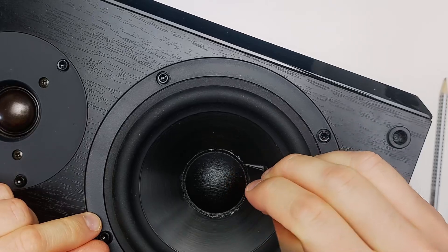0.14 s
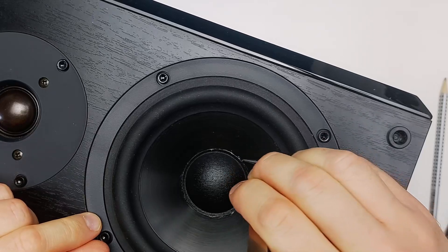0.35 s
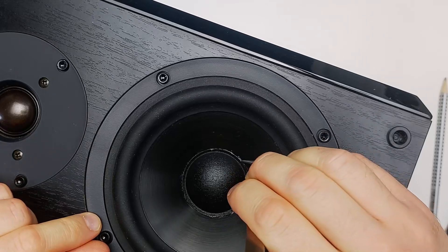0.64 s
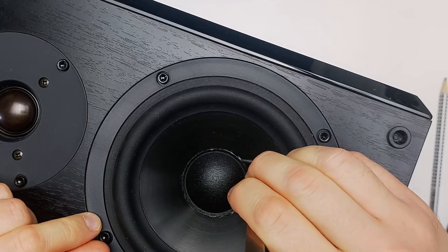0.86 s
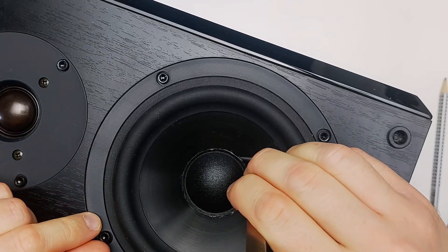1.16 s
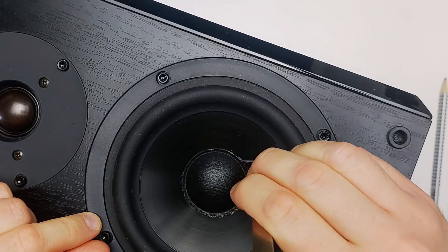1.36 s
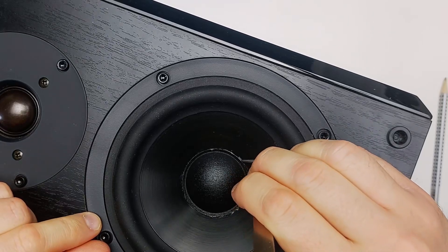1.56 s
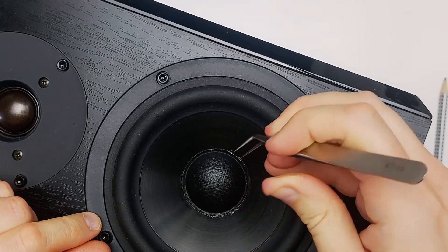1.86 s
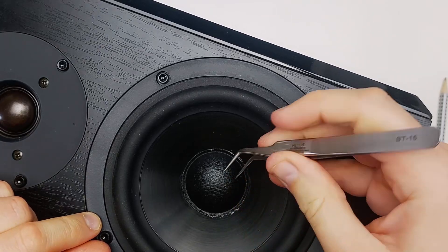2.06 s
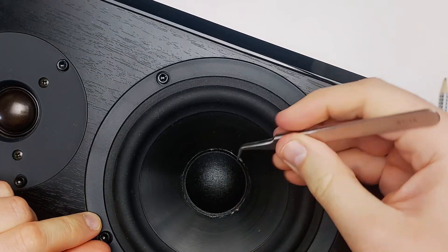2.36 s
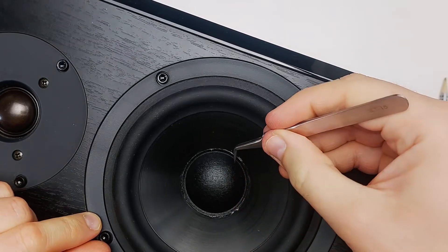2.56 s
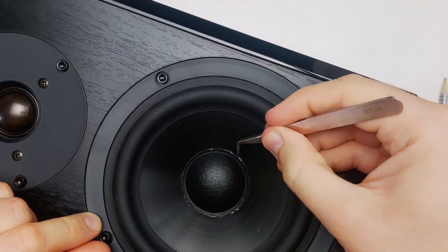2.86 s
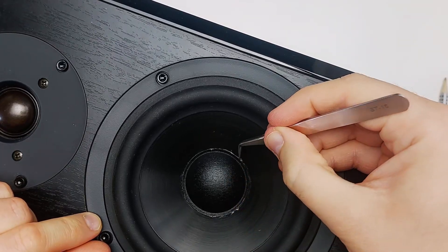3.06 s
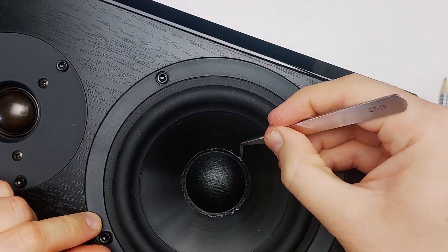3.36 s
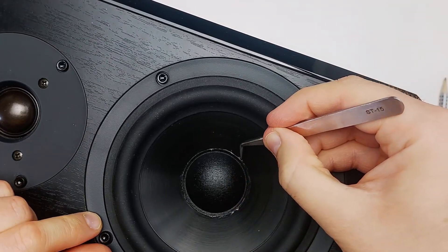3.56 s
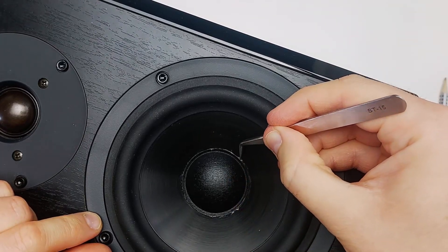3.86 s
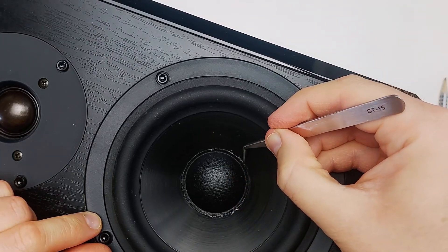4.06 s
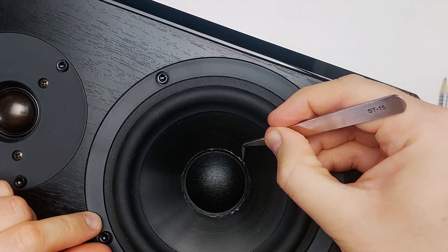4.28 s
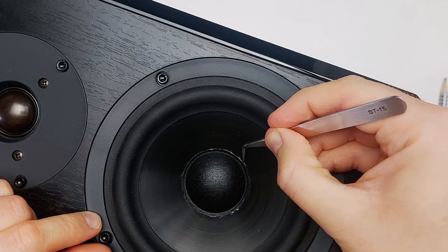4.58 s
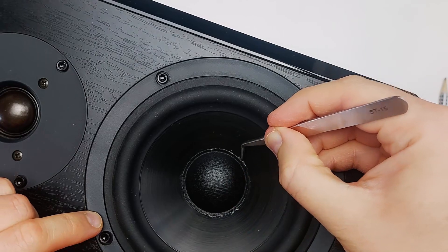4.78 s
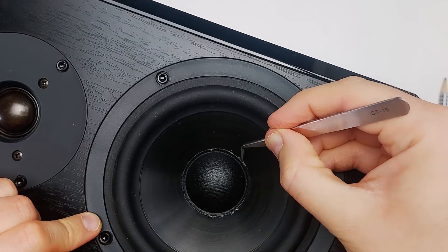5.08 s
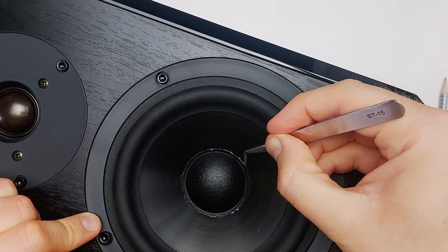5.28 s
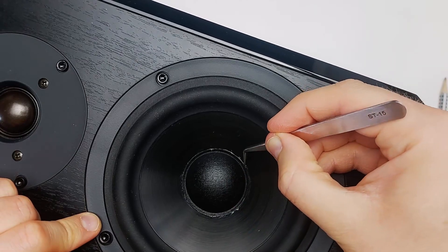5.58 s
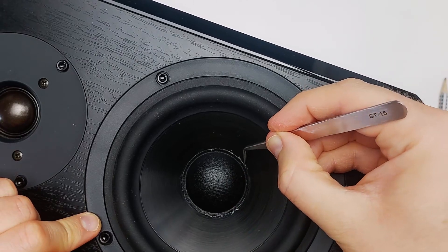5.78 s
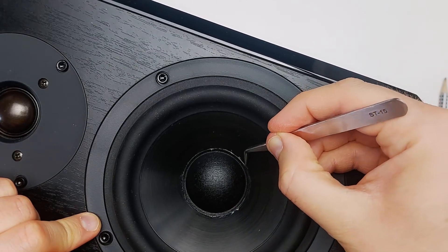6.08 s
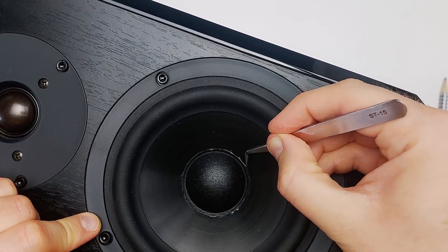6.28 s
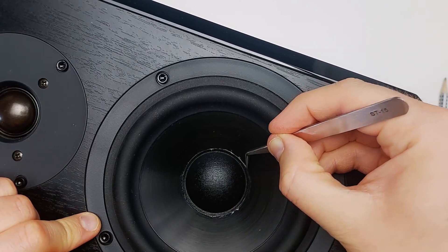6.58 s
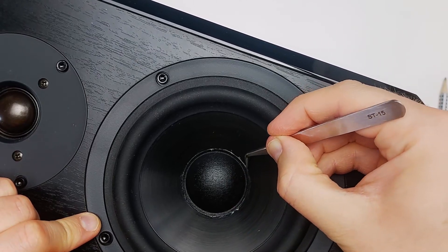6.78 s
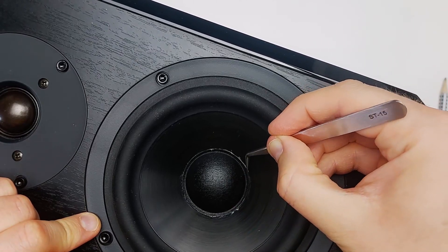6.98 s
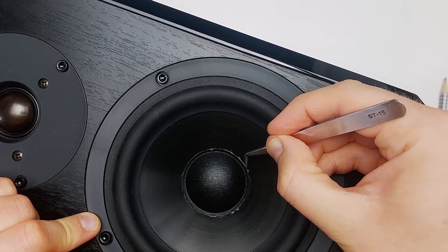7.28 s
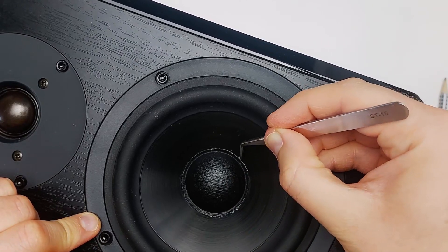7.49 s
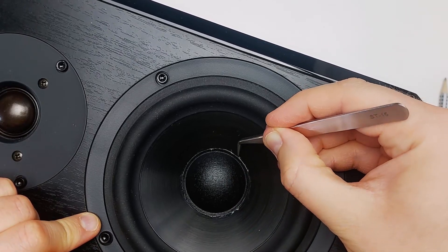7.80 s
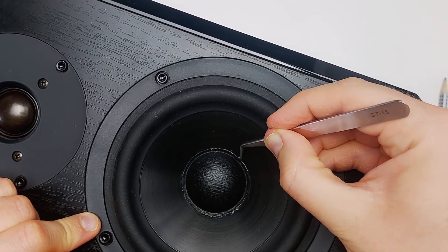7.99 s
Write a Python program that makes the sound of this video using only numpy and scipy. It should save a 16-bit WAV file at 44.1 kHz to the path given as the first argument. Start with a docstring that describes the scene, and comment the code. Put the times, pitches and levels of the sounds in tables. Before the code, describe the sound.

Tweezers pick at a loudspeaker cone with small hollow knocks, ticks and light scratches over a low hum.

```python
"""Small thuds, knocks, ticks and scratches sound over a low mains hum and faint room and microphone noise.
Steel tweezers are picking at old glue on the paper cone of a loudspeaker lying on a table.
Each touch sets the box, its panels, the cone and the steel tip ringing; scraping shakes them with many
tiny slips. The cone knocks softly as it settles back, the tweezer arms clink, and a hand brushes past.
Below, a "mode" is one tone an object rings at, and "t60" is the time it takes to fade by 60 dB."""
import sys
import numpy as np
from scipy import signal
from scipy.fft import rfft, irfft, next_fast_len
from scipy.io import wavfile

SR = 44100
rng = np.random.default_rng(int(sys.argv[2]) if len(sys.argv) > 2 else 0)


def dump(signal):
    """Clip the signal to [-1, 1] and save it as 16-bit WAV at the path in sys.argv[1]."""
    limited = np.clip(np.atleast_2d(signal).T, -1, 1)
    pcm = np.round(limited * 32767).astype(np.int16)
    wavfile.write(sys.argv[1], SR, pcm)


N = 358974


def from_db(db):
    """Turn decibels into a gain to multiply by."""
    return 10 ** (np.asarray(db) / 20)


def pan(db):
    """Left and right gains, with the left louder by db."""
    return from_db([[db / 2], [-db / 2]])


def rms_one(x):
    """Scale a signal to an average level (rms) of 1."""
    return x / np.sqrt(np.mean(x ** 2) + 1e-20)


def at_hz(points, hz):
    """Read between the rows of a (frequency, value) table, with octaves evenly spaced."""
    freqs, values = np.transpose(points)
    return np.interp(np.log(hz), np.log(freqs), values)


def drift(rate_hz):
    """A slow random wobble, about 1 in size."""
    keep = np.exp(-80 * np.pi * rate_hz / SR)
    noise = rng.standard_normal(N // 40 + 2002)   # one value every 40 samples
    slow = signal.lfilter([1], [1, -2 * keep, keep * keep], noise)[2000:]
    return np.interp(np.arange(N) / 40, np.arange(len(slow)), rms_one(slow))


def ring(clicks, hz, t60):
    """Each click starts a fading sine wave as tall as the click."""
    keep, turn = from_db(-60 / (t60 * SR)), 2 * np.pi * hz / SR
    return signal.lfilter([0, np.sin(turn)], [1, -2 * keep * np.cos(turn), keep * keep], clicks + 1e-18)


def banded_noise(spectrum, flicker_db):
    """Stereo noise of rms 1, built from third-octave bands that each flicker on their own."""
    # how alike left and right are: (frequency [Hz], likeness [1 = the same])
    likeness = [(30, 0.96), (120, 0.77), (300, 0), (700, .15), (1500, 0), (5500, 0), (7500, 0.95),
                (15000, 1)]
    out, edges = 0, 25 * 2 ** np.arange(0, 9.4, 1 / 3)
    white = rng.standard_normal((2, 2, N))
    for k, (low, high) in enumerate(zip(edges, edges[1:])):
        band = signal.butter(2, [low, high], "band", fs=SR, output="sos")
        mid, side = signal.sosfilt(band, white[k % 2])
        hz = np.sqrt(low * high)
        alike = np.clip(at_hz(likeness, hz), -.78, .78)
        gain = from_db(at_hz(spectrum, hz) + flicker_db * drift(10))
        out = out + gain * (np.sqrt(1 + alike) * mid + np.sqrt(1 - alike) * side * [[1], [-1]])
    return rms_one(out)


def strokes(rows, rise_db_per_s, fall_db_per_s):
    """Each stroke swells up to its start, holds, then fades; gives one gain curve per level column."""
    t, out = np.arange(N) / SR, 0
    for start, length, *level_db in rows:
        before, after = np.maximum(start - t, 0), np.maximum(t - start - length, 0)
        near = (before < 1) & (after < 1)
        drop_db = rise_db_per_s * before[near] + np.c_[fall_db_per_s] * after[near]
        gain = np.zeros((len(level_db), N))
        gain[:, near] = from_db(np.c_[level_db] - drop_db)
        out = out + gain
    return out


def background_noise():
    """The room and the microphone add a faint rumble and hiss."""
    # tone of the noise: (frequency [Hz], relative level [dB])
    colour = [(30, -12), (60, -1), (85, -5.5), (120, -1.5), (165, -10), (215, -5.5), (300, -12),
              (400, -23.5), (520, -16.5), (800, -31), (1200, -28.5), (2000, -35.5), (3500, -41),
              (6300, -46), (7800, -46), (10000, -39), (13000, -48), (16000, -38.5)]
    return from_db(-62.5) * banded_noise(colour, flicker_db=1.4)


def mains_hum():
    """Mains power hums in low tones that waver a little."""
    # hum tones: (frequency [Hz], level [dB], waver [dB])
    tones = [(120.0, -54.5, 0.5), (60.0, -75.5, 1.5), (210, -77.5, 6.5)]
    t, out = np.arange(N) / SR, 0
    for hz, level_db, waver_db in tones:
        height = np.sqrt(2) * from_db(level_db + waver_db * drift(1))
        out = out + height * np.sin(2 * np.pi * hz * t + 0.37 * drift(1.8))
    return out * pan(1)


def room_echo(x, t60=0.27, wall_cut_hz=3500):
    """Sound bounces between walls: six repeating echoes a side, softer and duller each time round."""
    size = next_fast_len(N + SR)
    turn = 2 * np.pi * np.arange(size // 2 + 1) / size   # frequency in radians per sample
    dull = 1 / (1 + 1j * turn * SR / (2 * np.pi * wall_cut_hz))
    lags = rng.uniform(.008, 0.046, (2, 6)) * SR
    response = np.zeros((2, len(turn)), complex)
    for (side, k), lag in np.ndenumerate(lags):
        trip = from_db(-60 * lag / SR / t60) * dull * np.exp(-1j * turn * round(lag))
        response[side] += (-1) ** k * trip / (1 - trip)   # all the round trips added up
    return irfft(rfft(x, size) * response, size)[:, :N]


def hand_brush():
    """Skin and sleeve brush past in one short puff of noise."""
    # the brushing move: (start [s], length [s], level [dB])
    moves = [(1.714, 0.029, -60)]
    # its tone: (frequency [Hz], relative level [dB])
    colour = [(700, -3), (1100, -2), (1500, -3), (1900, 4), (2400, -15), (3700, -15.5), (5200, -9.5),
              (6200, -16.5), (7500, -14), (11000, -19), (16000, -22)]
    swell = strokes(moves, rise_db_per_s=1600, fall_db_per_s=[272])
    return swell * banded_noise(colour, flicker_db=2.0) * pan(3)


def finger_slides():
    """Fingers slide along the steel with a brief, high hiss."""
    # the slides: (start [s], length [s], level [dB])
    moves = [(2.079, 0.011, -80), (2.422, .005, -73)]
    # their tone: (frequency [Hz], relative level [dB])
    colour = [(3000, -12), (7000, -8), (11500, -3), (16000, -1)]
    swell = strokes(moves, rise_db_per_s=6000, fall_db_per_s=[150])
    return swell * banded_noise(colour, flicker_db=1.0)


def squeak(start_s=3.207, hz=4200, t60=.08, level_db=-77):
    """A short rub sets one high tone ringing."""
    t = np.arange(N) / SR - start_s
    rub = (t > 0) * np.exp(-abs(t) / .025) * rng.standard_normal(N)
    ring_gain = np.sqrt(t60 * SR / np.log(1000) / 4)   # how much ringing boosts noise
    return from_db(level_db) * ring(rub, hz, t60) / ring_gain


def cone_knocks():
    """The cone settles back with hollow knocks; ringing each mode twice makes them swell softly."""
    # the knocks: (time [s], level [dB])
    knocks = [(4.452, -50), (4.748, -50.5), (5.06, -41.5), (5.395, -47), (5.672, -46.5), (5.788, -61),
              (5.904, -46), (6.149, -44.5), (6.637, -50.5), (6.867, -47.5), (7.087, -42), (7.36, -47.5),
              (7.694, -48.5)]
    # their hollow modes: (frequency [Hz], level [dB], t60 [s], time shift [s])
    modes = [(264, 1, 0.044, 0.0), (394.7, -13.5, 0.059, 0.0), (545, -16, 0.026, -.004)]
    times, knock_db = np.transpose(knocks)
    luck, out = rng.standard_normal((len(times), len(modes))), np.zeros(N)
    for k, (hz, level_db, t60, shift) in enumerate(modes):
        drive = np.zeros(N)
        drive[((times + shift) * SR).astype(int)] = from_db(knock_db + level_db + 2.0 * luck[:, k])
        peak = t60 * SR / (2 * np.e * np.log(1000))   # height a click reaches after two rings
        out += ring(ring(drive, hz, t60), hz, t60) / peak
    return out * pan(4)


def struck(modes, times, blow_db, spread_db, soft_hz, rubbing=0, tilt_db=0, crunch_s=0, rub_tilt_db=0):
    """Blows and rubbing ring an object's modes; a tilt (dB per octave) above 0 favours the high ones."""
    at, out = np.round(np.asarray(times) * SR).astype(int), np.zeros((2, N))
    luck = rng.standard_normal((len(at), len(modes), 3))   # random strength: shared, left, right
    soft = signal.butter(4, min(soft_hz, .45 * SR), fs=SR, output="sos")   # soft contact dulls a blow
    cracks = rng.standard_normal(N)
    for k, (hz, level_db, t60, pan_db) in enumerate(modes):
        octaves_up = np.log2(hz / modes[0][0])
        luck_db = spread_db * (luck[:, k, :1] + 0.79 * luck[:, k, 1:]).T
        drive = np.zeros((2, N))
        drive[:, at] -= from_db(blow_db + tilt_db * octaves_up + luck_db)
        if crunch_s:   # each blow becomes a burst of cracks dying over this time
            keep = np.exp(-1 / (crunch_s * SR))
            drive = cracks * signal.lfilter([np.sqrt(1 - keep ** 2)], [1, -keep], drive + 1e-18)
        drive += rubbing * from_db(rub_tilt_db * octaves_up)
        out += from_db(level_db) * pan(pan_db) * ring(drive, hz, t60)
    return signal.sosfilt(soft, out)


def grit(per_s, spread_db, apart):
    """Tiny random slips, a few much larger; `apart` is the gain of extra slips heard on one side only."""
    sizes = from_db(spread_db * np.minimum(rng.exponential(1, (3, N)), 4)) * rng.choice([-1, 1], (3, N))
    slips = sizes * (rng.random((3, N)) < per_s / SR)
    return rms_one(slips[0] + apart * slips[1:])


def tip_pressure():
    """The tip's scrapes add to its resting weight; gives strength curves for cone, box and rasp."""
    # scrapes across the glue: (start [s], length [s], cone [dB], box [dB], rasp [dB])
    scrapes = [(0.004, 0.02, -60, -43, -82), (0.43, 0.024, -67, -49.5, -90), (0.89, 0.018, -67, -58.5, -84),
               (1.19, 0.045, -62, -43, -79), (1.52, .01, -74, -49.5, -91), (1.6, 0.022, -65.5, -52.5, -90),
               (2.85, .04, -72, -52, -87), (3.235, .03, -69, -59, -83), (3.31, 0.014, -70, -67, -76),
               (3.58, 0.01, -58, -61, -78), (3.82, 0.022, -75, -50.5, -89), (4.025, 0.03, -56, -66, -78.5),
               (4.35, 0.023, -77, -57, -84), (4.64, 0.045, -61, -52, -80.5),
               (4.974, 0.0078, -61, -41, -66.5), (5.28, 0.035, -55, -46, -75.5),
               (5.6, 0.016, -71, -52, -97), (5.89, 0.026, -79, -54.5, -94), (6.04, 0.024, -63, -53.5, -92),
               (6.27, 0.018, -66, -56, -86), (6.4, .01, -78, -50.5, -77), (6.5, 0.029, -59.5, -50, -76.5),
               (6.75, 0.033, -54, -45, -74), (6.982, 0.018, -55, -46.5, -78.5), (7.25, 0.03, -62, -59, -80),
               (7.56, 0.045, -59, -52, -75), (7.66, 0.028, -70, -46, -76), (7.93, 0.049, -61, -47.5, -83),
               (8.02, .02, -79, -53.5, -76.5)]
    # weight of the resting tip: (time [s], push on the box [dB])
    weight = [(0.4, -69), (0.8, -53.5), (1.1, -63), (1.68, -59.5), (1.75, -87), (2.7, -81), (2.9, -65),
              (4.1, -55), (4.4, -48.5), (5.3, -53.5), (6.2, -55.5), (6.9, -50.5), (7.201, -52.5),
              (7.401, -50), (7.5, -78), (8.14, -59)]
    times, push_db = np.transpose(weight)
    rest_db = np.interp(np.arange(N) / SR, times, push_db)
    resting = from_db(rest_db + np.c_[[-24, 0, -38.5]])   # weaker in the cone and the rasp
    return strokes(scrapes, rise_db_per_s=992, fall_db_per_s=[363, 141, 377]) + resting


def crumbling_glue(times, level_db, t60=0.13):
    """Glue crumbles after each touch; gives a strength curve that jumps up and dies away."""
    jumps = np.zeros(N)
    jumps[(times * SR).astype(int)] = from_db(level_db)
    return signal.lfilter([1], [1, -from_db(-60 / (t60 * SR))], jumps)


def glue_rasp(strength):
    """The tip drags over the glue with a flickering hiss."""
    # tone of the rasp: (frequency [Hz], relative level [dB])
    colour = [(1500, -9), (2500, 7), (4300, 5.5), (6500, 0), (8000, 5), (11000, -5), (16000, 1)]
    return from_db(-3.0) * strength * banded_noise(colour, flicker_db=1.6)


def steel_ticks(times, tip_db, rubbing, crunch_s=.0008):
    """The tip ticks and scratches, and the tweezer arms clink; thin steel gives off little low sound."""
    # modes of the tip and of the arms: (frequency [Hz], level [dB], t60 [s], left over right [dB])
    tip_modes = [(4400, -24, .012, 8), (5900, -23, .006, 12), (7910, -4, .004, 12), (9570, -4, .003, 12),
                 (11000, -9, .002, 6), (14500, -12, .002, 4)]
    arm_modes = [(4300, -10, .025, 7), (6000, -8, .015, 10), (8500, -5, .016, 10), (11300, -5, .03, 8),
                 (13300, -12, .015, 6), (15300, -6, .015, 4)]
    # clinks of the arms, dry ticks of the tip alone: (time [s], level [dB], sharpness [dB per octave])
    clinks = [(2.4193, -54, 5), (4.972, -44.5, -13.5), (7.646, -45, -14), (8.0134, -48.5, -9)]
    ticks = [(0.888, -70, 7), (1.669, -66, 5), (2.0783, -78, 3)]
    out = struck(tip_modes, times, tip_db, spread_db=3.7, soft_hz=18000, rubbing=rubbing,
                 crunch_s=crunch_s)
    clink_s, clink_db, clink_tilt_db = np.transpose(clinks)
    out += struck(arm_modes, clink_s, clink_db - 9.5, spread_db=4.05, soft_hz=20000,
                  tilt_db=clink_tilt_db, crunch_s=crunch_s)
    tick_s, tick_db, tick_tilt_db = np.transpose(ticks)
    out += struck(tip_modes, tick_s, tick_db, spread_db=2.2, soft_hz=20000,
                  tilt_db=tick_tilt_db, crunch_s=crunch_s)
    return signal.sosfilt(signal.butter(2, 3800, "high", fs=SR, output="sos"), out)


def tweezers_on_speaker():
    """Touches and scrapes shake the box, its panels, the paper cone and the steel together."""
    # touches: (time [s], cone [dB], box [dB], panel [dB], tip [dB], sharpness [dB per octave])
    touches = [(0.008, -53, -41, -49.5, -95, 1), (0.435, -63, -46, -50.5, -95, -3),
               (0.462, -71, -46, -62, -92, -12), (0.623, -73, -49, -56.5, -90, 0),
               (0.789, -79, -44, -79, -91, 2), (1.139, -41, -67, -37, -73, -10),
               (1.204, -75, -47.5, -52, -77, 6), (1.301, -52, -68, -45, -84, -10),
               (1.517, -46, -52.5, -37.5, -97, -4), (1.594, -44.5, -72, -44, -95, -4.5),
               (1.705, -46.5, -46.5, -52, -88, -8), (2.803, -46.5, -46, -54.5, -80, -8),
               (2.863, -53, -60, -49.5, -91, -7), (2.941, -49.5, -45, -63, -84, -21),
               (3.087, -59.5, -58, -60, -77, -4), (3.229, -42, -41.5, -46.5, -72.5, 1),
               (3.297, -48.5, -47.5, -43.5, -84, 0), (3.314, -46.5, -63, -78, -76, 3),
               (3.568, -52, -47.5, -55, -81, -1), (3.669, -68, -61, -63, -76, 10),
               (3.745, -61, -47.5, -68, -93, -4), (3.819, -52, -59, -53, -86, -11),
               (4.02, -65, -72, -52.5, -81, 9.5), (4.083, -44.5, -53.5, -53, -70.5, 7.5),
               (4.171, -56, -47, -50, -76, 1.5), (4.252, -41, -40.5, -48, -69.5, -5),
               (4.344, -42.5, -40, -58, -77, -5), (4.378, -39.5, -57, -52, -76.5, 1.5),
               (4.443, -72, -62, -70, -76.5, 6), (4.533, -45, -65, -55, -79, -13),
               (4.632, -41.5, -38.5, -36.5, -74.5, 3), (4.832, -41.5, -46, -47.5, -67, -1),
               (4.903, -49, -41.5, -56, -74, 0.5), (4.952, -45, -42, -47, -92, -7),
               (4.969, -44, -41, -31.5, -81, 7.5), (4.986, -51, -44.5, -39, -88, -1),
               (5.154, -43.5, -47, -54, -73.5, -4), (5.272, -42.5, -38.5, -40, -76, -1),
               (5.307, -57, -48, -41.5, -75, 11.5), (5.384, -57, -57, -54, -86, 2.5),
               (5.474, -70, -57, -61, -92, -8), (5.602, -53.5, -42.5, -58, -89, 3),
               (5.87, -46.5, -42, -53, -80, -5), (5.975, -47, -59, -57, -98, -6),
               (6.162, -69.5, -45.5, -62, -74, 9.5), (6.208, -46, -49.5, -47.5, -71, -1.5),
               (6.26, -52, -50, -63, -87, -7), (6.295, -42.5, -69, -46.5, -88, -3.5),
               (6.394, -48.5, -39, -42, -63, -1), (6.45, -40.5, -62, -45.5, -69, -3),
               (6.518, -48, -36, -44, -70, 0), (6.603, -72, -49.5, -55.5, -77, -2),
               (6.698, -41.5, -43, -47, -75, -5), (6.743, -53, -64, -42, -77, -10),
               (6.78, -62, -42.5, -63, -80, 12.5), (6.867, -82, -51, -50.5, -77, -4),
               (6.946, -42, -41.5, -49, -67, 0), (7.047, -52, -42, -53, -81, 4),
               (7.251, -64, -49.5, -53, -83, 10), (7.274, -59, -50.5, -47.5, -85, -13),
               (7.304, -57, -73, -44.5, -78, 2), (7.458, -54.5, -52.5, -73, -93, 1),
               (7.572, -57, -55, -48.5, -83, 6), (7.619, -43.5, -50, -49, -89, -8),
               (7.647, -39.5, -64, -36, -73, 3), (7.854, -48, -51, -60.5, -91, -21),
               (7.967, -50, -65, -75, -87, -1), (8.014, -43.5, -42.5, -41.5, -80, 0)]
    # modes of the speaker's parts: (frequency [Hz], level [dB], t60 [s], left over right [dB])
    box_modes = [(68, -20, 0.069, -1), (103, -10.5, 0.021, 0), (125, 2.5, 0.13, 1.5),
                 (166.2, -0.5, 0.074, 0.5)]
    panel_modes = [(213.7, -2.5, 0.092, 1.5), (242.6, 0.5, 0.071, 1.5), (291.2, -15, 0.11, 1.5),
                   (372, -24, 0.021, 2.6)]
    cone_modes = [(430, 0.5, 0.01, 2.2), (556, 1, 0.021, 12), (625, 6.5, 0.025, 2.6), (711, -1, 0.062, 6.4),
                  (795.7, -3.5, 0.067, 7), (882, -2, 0.047, 8.3), (1044, -5.5, 0.02, 18.2),
                  (1156, -6, 0.025, 9.4), (1504, -22.5, 0.077, 14), (1899, -5.5, 0.018, 5.1),
                  (2095, -13.5, 0.028, 0.84)]
    times, cone_db, box_db, panel_db, tip_db, tilt_db = np.transpose(touches)
    times = times + 0.001546   # every touch sounds about 1.5 ms after its listed time
    on_cone, on_box, rasp = tip_pressure()
    slips = grit(per_s=550, spread_db=4, apart=0.68)
    pushes = on_box * grit(per_s=250, spread_db=4, apart=0.28)
    scratching = (from_db(-36.5) * on_cone + crumbling_glue(times, cone_db - 49.5)) * slips
    box = struck(box_modes, times, box_db + 0.5, spread_db=2.93, soft_hz=306,
                 rubbing=from_db(-31) * pushes)
    panels = struck(panel_modes, times, panel_db + 0.5, spread_db=1.8, soft_hz=607,
                    rubbing=from_db(-36) * pushes)
    cone = struck(cone_modes, times, cone_db - 14.5, spread_db=3.2, soft_hz=1820,
                  rubbing=scratching, tilt_db=tilt_db, rub_tilt_db=3.5)
    bass_cut = signal.butter(3, 70, "high", fs=SR, output="sos")   # a small box gives off no deep bass
    speaker = signal.sosfilt(bass_cut, box + panels + cone)
    right_lag = np.round(.00012 * SR)   # the path to the right side is longer
    speaker[1] = np.interp(np.arange(N) - right_lag, np.arange(N), speaker[1])
    steel = steel_ticks(times, tip_db + 11.5, rubbing=from_db(-27.5) * rasp * slips[0])
    return speaker + steel + glue_rasp(rasp)


def scene():
    """Mix the work on the speaker and its echo with the hand, the noise and the hum."""
    work = tweezers_on_speaker() + cone_knocks() + squeak()
    hand = hand_brush() + finger_slides()
    noise = background_noise()
    echo = from_db(-14.5) * room_echo(work.mean(axis=0))
    return work + echo + hand + noise + mains_hum()


def record(dry):
    """The microphone drops the deepest bass, and the highest treble is cut."""
    thin = signal.sosfilt(signal.butter(2, 40, "high", fs=SR, output="sos"), dry)
    return signal.sosfilt(signal.cheby2(16, 40, 16100, fs=SR, output="sos"), thin)


dry = scene()
out = record(dry)
dump(out)
```